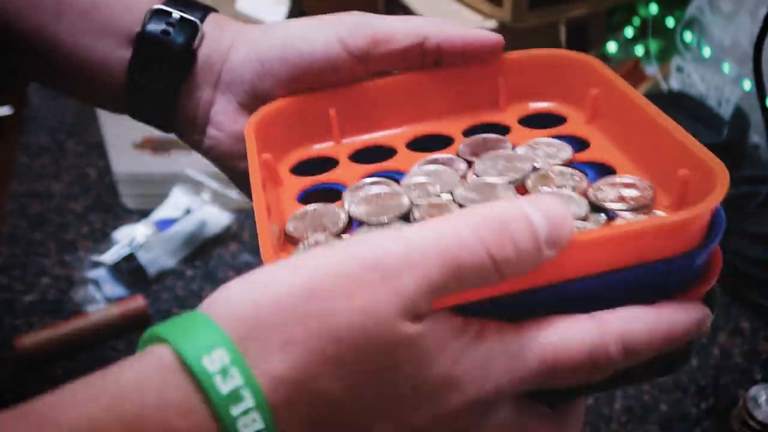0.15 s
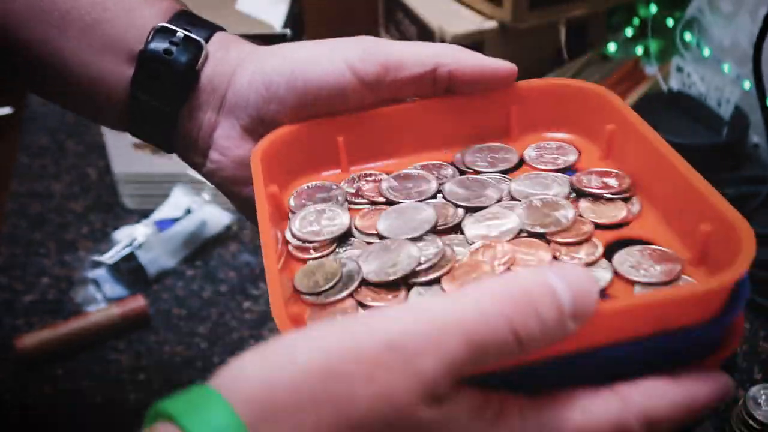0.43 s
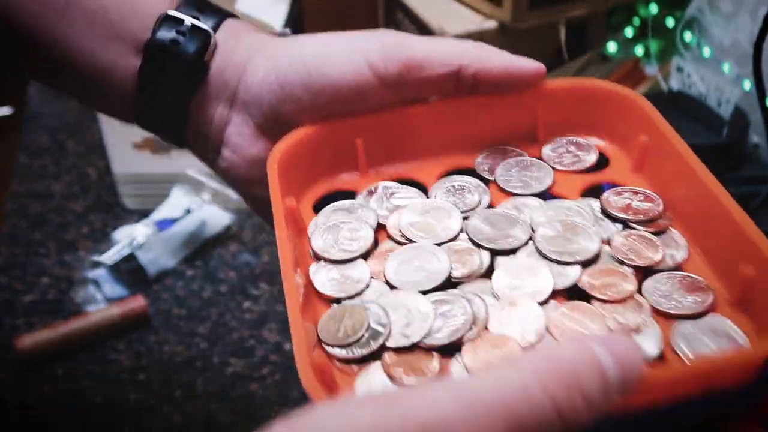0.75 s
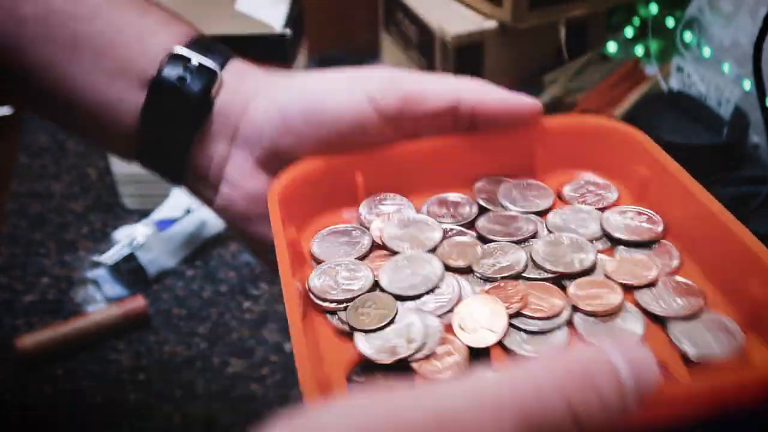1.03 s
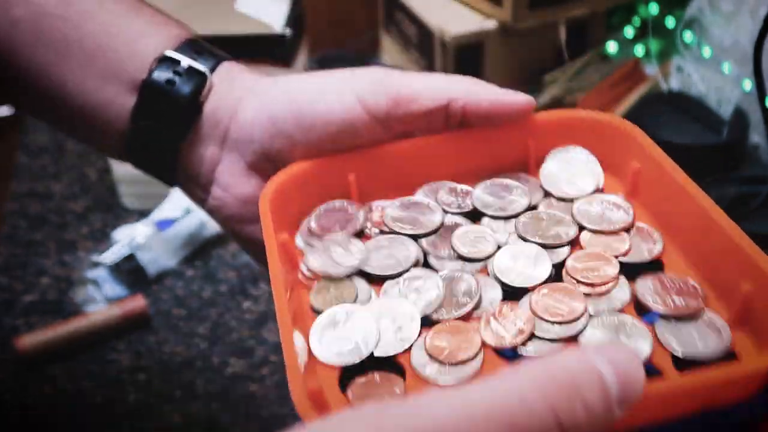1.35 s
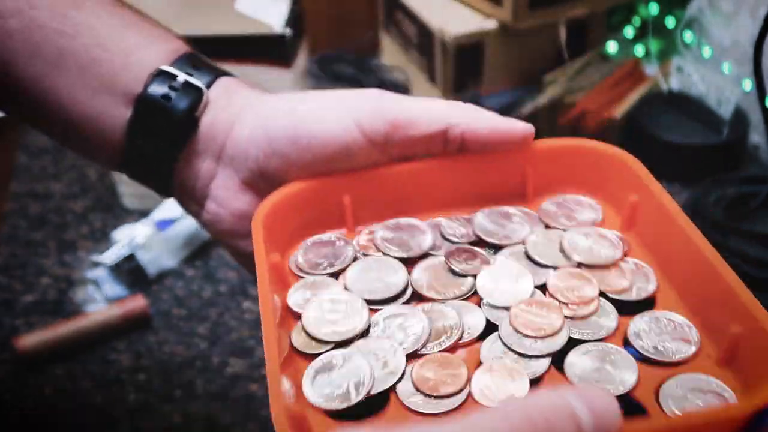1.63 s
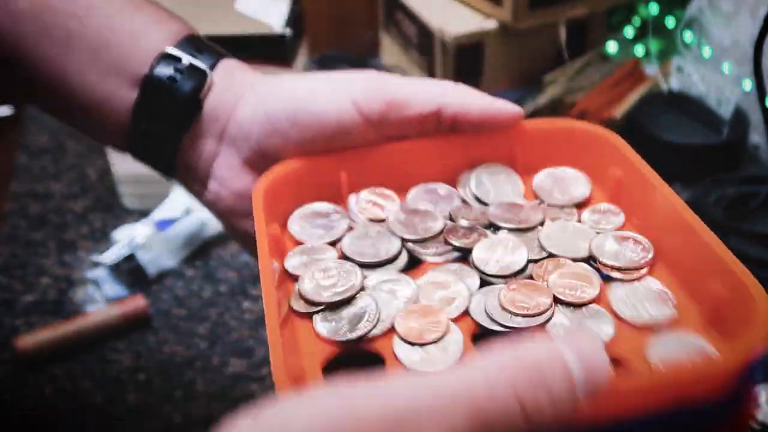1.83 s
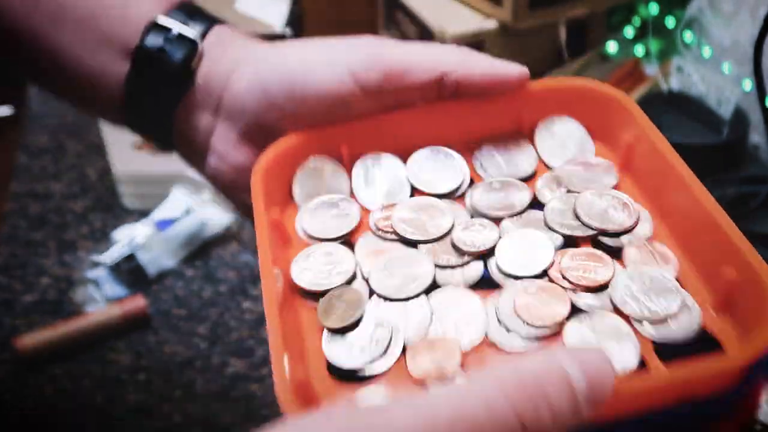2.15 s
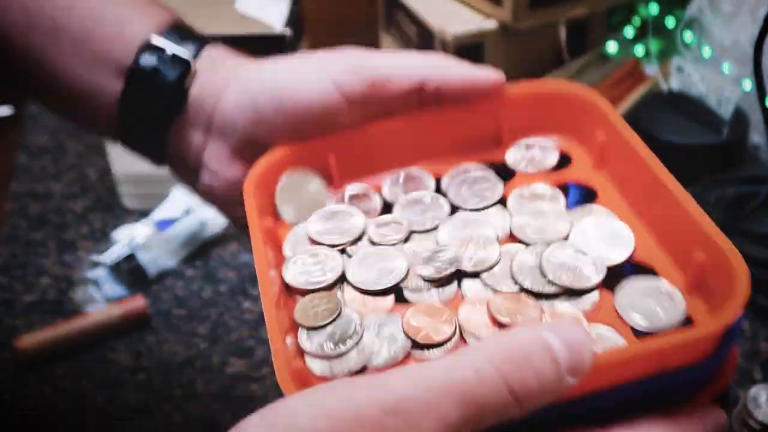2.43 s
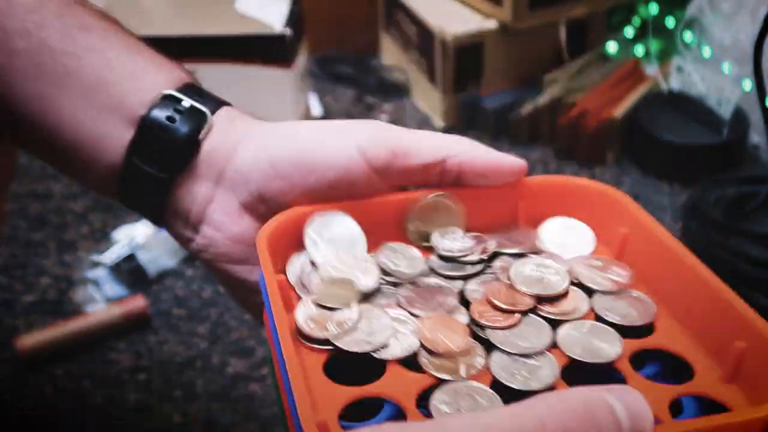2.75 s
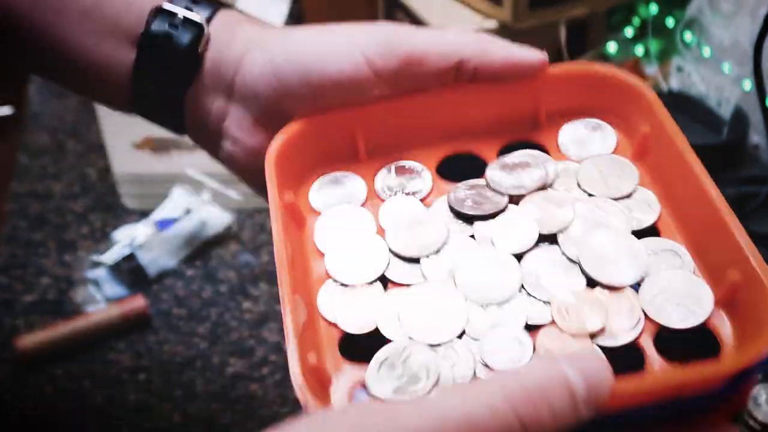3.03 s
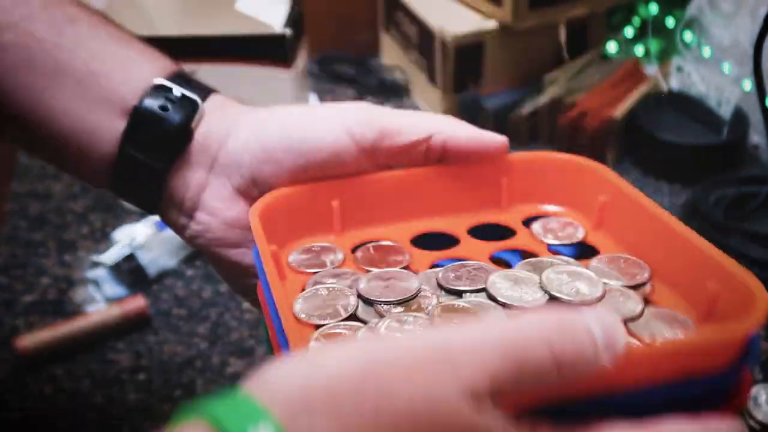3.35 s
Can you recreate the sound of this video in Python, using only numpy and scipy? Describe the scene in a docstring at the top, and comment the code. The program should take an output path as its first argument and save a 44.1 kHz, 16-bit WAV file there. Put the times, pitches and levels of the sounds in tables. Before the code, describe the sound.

Loose coins rattle and clink continuously in a plastic tray shaken by hand.

```python
"""Indoors, close up, in stereo: loose coins rattle in a plastic sorting tray shaken by hand.
Thousands of small knocks ring the tray floor, clatter on its ribs and set the coins singing high up.
Hard knocks stand out, each with a tick and a pitch. The tray bumps with low thuds over faint room tone."""
import sys
import numpy as np
from scipy import signal
from scipy.fft import rfft, irfft
from scipy.io import wavfile
from scipy.ndimage import uniform_filter1d

SR = 44100
rng = np.random.default_rng(int(sys.argv[2]) if len(sys.argv) > 2 else 0)


def inscribe(sig):
    """Save sig as 16-bit PCM at rate SR to the path in sys.argv[1].

    A 1-D sig is mono; a 2-D sig holds one channel per row.
    Samples are clipped to [-1, 1] before scaling.
    """
    pcm = np.round(np.clip(np.atleast_2d(sig).T, -1, 1) * 32767)
    wavfile.write(sys.argv[1], SR, pcm.astype(np.int16))


N = 154350
SPOTS, RING_SAMPLES = 127, 6144  # impact spots on the tray; response length of each


def rattle():
    """Coins striking a tray too small to radiate bass; rows are mid and side."""
    rings = np.array([[spot_rings() for _ in range(2)] for _ in range(SPOTS)])  # spot, row, part, time
    rings /= np.sqrt((rings ** 2).sum(-1).mean((0, 1)))[:, None]  # unit mean energy per part
    knocks = small_knocks(rings) + hard_knocks(rings)
    return signal.sosfilt(signal.butter(5, 317, "high", fs=SR, output="sos"), knocks)


def small_knocks(rings):
    """Random impacts in clumps, denser when shaken hard; the coins move on from spot to spot."""
    # shaking: t/s, clatter level/dB, floor re clatter/dB, coin re clatter/dB (before trim_db)
    shake = [(0.0, -36, 2.5, -14), (0.02, -32.5, -3, -16), (0.08, -33.5, -4, -2.5), (0.1, -31.5, 4, -6),
             (0.202, -21.5, -10.5, -11), (0.251, -32, -7, -14), (0.28, -34.5, 0.5, -6),
             (0.33, -27.5, -1, -4.5), (0.371, -16.5, -6, -8.5), (0.381, -23.5, -6, -2.5),
             (0.541, -42, 1.5, -6), (0.555, -33, 2, -6), (0.58, -35.5, 6.5, -9), (0.59, -22, -3.5, -13.5),
             (0.659, -26, -1, -8), (0.69, -35, 0, -9), (0.78, -28.5, -1, -4.5), (0.84, -34.5, -0.5, -6),
             (0.89, -30, -1, -7), (0.928, -44, 6.5, -4.5), (0.999, -18, -5.5, -6), (1.072, -31.5, -1, -2.5),
             (1.171, -18, -5, -7.5), (1.239, -29, -2.5, -3.5), (1.319, -26, -2, -4.5),
             (1.34, -32.5, -7.5, -2.5), (1.4, -28, 2.5, -7), (1.46, -29, -0.5, 1), (1.54, -29, -2.5, -8),
             (1.59, -30, -7, -3.5), (1.63, -30, -3.5, -12), (1.7, -18.5, -7.5, -8), (1.75, -35, -4, -3),
             (1.77, -24.5, -2, -13.5), (1.849, -29.5, -4, -2), (1.895, -34.5, -2, -2),
             (1.921, -24.5, -6.5, -10), (1.951, -14.5, -4.5, -11), (1.981, -23, -5.5, -4),
             (2.029, -31, -0.5, -1.5), (2.11, -23, -3, -7), (2.13, -28.5, -5.5, 0.5),
             (2.25, -25, -3.5, -9.5), (2.3, -27.5, -1, -2.5), (2.382, -22, -5, -6.5), (2.47, -30, -7, -7),
             (2.52, -28, -2.5, -5), (2.62, -36, -1, -2.5), (2.65, -39.5, -2, -11), (2.671, -29, -4.5, -9),
             (2.71, -39.5, -2.5, -13), (2.748, -41, 9.5, 4), (2.757, -22.5, -9.5, -16),
             (2.82, -21.5, -5, -4.5), (2.92, -28, -1.5, -1.5), (3.09, -29.5, -7, -9), (3.12, -31, -2, -7),
             (3.21, -23, -5, -7.5), (3.391, -36.5, -2, -4.5), (3.475, -34, 2, -9), (3.5, -23, -21, -17)]
    # knock-to-knock scatter/dB of clatter, floor, coin
    scatter_db = [1, 3.5, 3]
    trim_db = [0.5, 0.5, -3]
    base_knocks_per_s, moves_per_s, active_spots = 2300, 28, 30
    clump_db, clump_samples = 1, round(0.017 * SR)
    times_s, clatter_db, floor_db, coin_db = np.transpose(shake)
    t = np.arange(N) / SR
    density = gain_of(0.4 * (np.interp(t, times_s, clatter_db) - clatter_db.mean()))
    drift = uniform_filter1d(uniform_filter1d(rng.standard_normal(N), clump_samples), clump_samples)
    clumps = gain_of(clump_db * unit_rms(drift))
    size = gain_of(3 * np.minimum(rng.exponential(1, N), 4))
    struck = rng.random(N) < base_knocks_per_s * density / SR
    impacts = unit_rms(size * struck * rng.choice([-1, 1], N) * clumps / np.sqrt(density))
    spot = rng.integers(0, active_spots, N) + (moves_per_s * t).astype(int)
    drive = np.zeros((3, N))
    for part, db in enumerate([clatter_db, clatter_db + floor_db, clatter_db + coin_db]):
        uneven = unit_rms(impacts * gain_of(scatter_db[part] * rng.standard_normal(N)))
        drive[part] = uneven * gain_of(np.interp(t, times_s, db) + trim_db[part])
    out = np.zeros((2, N + RING_SAMPLES))
    for k in range(SPOTS):
        start = max(k - active_spots, 0) * SR // moves_per_s
        end = min((k + 1) * SR // moves_per_s + 1, N)
        hits = drive[:, start:end] * (spot[start:end] == k)
        out[:, start:end + RING_SAMPLES - 1] += signal.fftconvolve(hits[None], rings[k], axes=2).sum(1)
    return out[:, :N]


def hard_knocks(rings):
    """Single hard impacts: a tone, clatter around its pitch with a sharp tick, and the tray floor."""
    # hard impacts: t/s, level/dB, f/Hz, relative floor level/dB (before trim), damping t60/s
    knocks = [(0.0409, -18, 2060, -27, 0.059), (0.085, -14.5, 1700, -17, 0.032),
              (0.0902, -12, 1537, 8, 0.11), (0.1166, -9, 1600, -11, 0.034), (0.2, -8, 1650, -6, 0.052),
              (0.2828, -17, 4030, -26.5, 0.12), (0.3335, -13, 1360, 14.5, 0.017),
              (0.3534, -16.5, 4230, -10.5, 0.033), (0.3695, -8, 3770, -30.5, 0.054),
              (0.3818, -6, 2460, -22.5, 0.095), (0.4213, -9.5, 4100, -31, 0.03),
              (0.4498, -16.5, 1490, -11.5, 0.027), (0.5532, -9, 1690, 8, 0.026),
              (0.589, -15, 2100, -5, 0.043), (0.603, -11, 2500, -11, 0.027), (0.633, -5.5, 1650, -22, 0.02),
              (0.6364, -13, 1560, -23.5, 0.024), (0.7026, -14.5, 2420, -24, 0.025),
              (0.7669, -19, 1740, -15, 0.027), (0.8495, -18, 1540, -16, 0.042),
              (0.9693, -14, 4060, -22, 0.025), (0.9891, -7, 2250, -15, 0.035),
              (0.9966, -6, 3410, -20, 0.04), (1.0206, -7.5, 2630, -34, 0.037),
              (1.1154, -10, 2520, 1, 0.039), (1.1383, -10.5, 1610, -1, 0.066),
              (1.1668, -13, 2370, -17, 0.033), (1.1805, -1.5, 2060, -25, 0.024),
              (1.1904, -15, 1630, -15, 0.035), (1.416, -8.5, 2405, -29, 0.082),
              (1.4412, -10, 1700, -31, 0.045), (1.4543, -4, 1510, -41, 0.054),
              (1.5628, -14, 1700, -15, 0.04), (1.6347, -9.5, 5080, -16, 0.083),
              (1.657, -11, 2100, -18, 0.02), (1.6912, -5, 2040, -37, 0.019),
              (1.7644, -11.5, 2370, 0.5, 0.12), (1.8094, -11.5, 1660, -16, 0.046),
              (1.9111, -15.5, 1570, -2, 0.052), (1.939, -11, 1560, -7, 0.047),
              (1.9631, -6.5, 4440, -12, 0.096), (1.9708, -2, 1620, -10, 0.014),
              (1.9764, -7, 3720, -11, 0.034), (2.0101, -16, 1610, -17, 0.041),
              (2.0624, -9.5, 1620, -22, 0.022), (2.131, -13.5, 1730, -17, 0.083),
              (2.1917, -15, 1760, 4, 0.04), (2.2197, -11.5, 1700, -17, 0.063),
              (2.2605, -21, 1750, -16, 0.03), (2.2725, -15, 1840, -18, 0.085),
              (2.3251, -6, 3220, -22.5, 0.03), (2.3437, -14, 1550, -20.5, 0.03),
              (2.3905, -3, 3560, -30, 0.061), (2.4086, -4.5, 3950, -27, 0.04),
              (2.6643, -23, 2770, -11, 0.03), (2.7601, -9.5, 4400, -15, 0.042),
              (2.794, -9.5, 1800, -22, 0.038), (2.8795, -7.5, 2310, 4, 0.095),
              (3.0604, -14, 1860, -15, 0.033), (3.0689, -3.5, 3440, -2.5, 0.034),
              (3.0759, -8, 1880, -3, 0.053), (3.1637, -13, 1800, 2, 0.04), (3.1755, -10, 3500, -27, 0.032),
              (3.1963, -5, 3420, -12, 0.056), (3.2078, -8, 4600, -7, 0.069), (3.241, -9, 2200, -11, 0.033),
              (3.4386, -22, 1550, -1, 0.11), (3.4822, -12, 2320, -35, 0.079)]
    tone_db, tick_db, tail_db, floor_trim_db = -7, -5.5, -3.5, -8
    tick_t60_s, band_ratio = 0.0039, 1.97
    t = np.arange(RING_SAMPLES) / SR
    out = np.zeros((2, N + RING_SAMPLES))
    for k, (start_s, db, hz, floor_db, t60_s) in enumerate(knocks):
        clatter, floor, _ = unit_peak(rings[k]).transpose(1, 0, 2)
        band = signal.butter(2, [hz / band_ratio, hz * band_ratio], "band", fs=SR)
        clatter = unit_peak(signal.lfilter(*band, clatter))
        clatter *= gain_of(tail_db) + gain_of(tick_db - 60 * t / tick_t60_s)
        phase = [[0], [(-1) ** k * np.pi / 2]]  # side in quadrature with mid
        damping = gain_of(-60 * t / t60_s)
        tone = gain_of(tone_db) * damping * np.sin(2 * np.pi * hz * t + phase)
        knock = tone + clatter + gain_of(floor_db + floor_trim_db) * floor
        out[:, round(start_s * SR):][:, :RING_SAMPLES] += gain_of(db) * damping * knock
    return out[:, :N]


def spot_rings():
    """Impulse responses of one spot, with room reverb; rows are rib clatter, tray floor and coin."""
    # tray floor modes: f/Hz, level/dB, t60/s
    floor_modes = [(307, -18, 0.076), (424.5, -10.5, 0.33), (530, -21, 0.04), (568, -9.5, 0.052),
                   (633.4, -5.5, 0.14), (725.3, 4.5, 0.051), (829, 2.5, 0.077), (939, 0, 0.022),
                   (1073, -12, 0.36), (1090, -11.5, 0.25), (1540, 3.5, 0.064), (1700, 1.5, 0.077)]
    # rib clatter spectrum: f/Hz, density level/dB
    clatter_spectrum = [(1100, -8.5), (1540, -7.5), (1900, -2.5), (2500, -2.5), (3600, -4), (5000, -4),
                        (6300, -10), (8100, -14.5), (9400, -20.5), (12700, -20), (14000, -25), (15300, -21),
                        (16200, -8)]
    # rib clatter decay: f/Hz, t60/s
    clatter_decay = [(1200, .03), (3000, .024), (6000, .02), (16000, .018)]
    # coin modes: f/Hz, spread between coins/Hz, level/dB, t60/s
    coin_modes = [(9360, 340, 2, 0.064), (10590, 700, 0, 0.064), (11980, 720, -5, .03),
                  (12700, 340, -3, 0.056), (14900, 220, -4, 0.047)]
    wet_db, room_t60_s = -5, 0.13
    hz, db, t60_s = np.transpose(floor_modes)
    floor = ring(hz * (1 + 0.018 * rng.standard_normal(len(hz))), db, t60_s, scatter_db=4)
    hz = np.linspace(35, 127, num=60) ** 2 * rng.uniform(0.97, 1.03, size=60)
    db = lookup(clatter_spectrum, hz) + 5 * np.log10(hz)  # offsets the widening mode spacing
    clatter = ring(hz, db, lookup(clatter_decay, hz), scatter_db=6)
    hz, spread_hz, db, t60_s = np.transpose(coin_modes)
    coin = ring(hz + spread_hz * rng.standard_normal(len(hz)), db, t60_s, scatter_db=6)
    t = np.arange(RING_SAMPLES) / SR
    tail = rng.standard_normal(len(t)) * gain_of(-60 * t / room_t60_s) * (t > 0.003)
    room = (t == 0) + gain_of(wet_db) * tail / np.linalg.norm(tail)
    return signal.fftconvolve(np.array([clatter, floor, coin]), room[None], axes=1)[:, :len(t)]


def ring(hz, db, t60_s, scatter_db):
    """Struck modes of random sign; db sets each mode's energy before scatter."""
    t = np.arange(2560)[:, None] / SR
    height = gain_of(db + scatter_db * rng.standard_normal(len(hz))) / np.sqrt(t60_s)
    height *= rng.choice([-1, 1], len(hz))
    return (gain_of(-60 * t / t60_s) * np.sin(2 * np.pi * hz * t)) @ height


def thuds():
    """Tray bumps: two low modes that swell quickly and die."""
    # bumps: t/s, level/dB, lower mode f/Hz
    bumps = [(1.378, -39, 116), (1.452, -40, 217), (1.459, -36, 99), (1.515, -50, 78)]
    rise_s, t60_s, overtone_ratio = 0.0019, 0.12, 1.3
    t, out = np.arange(N) / SR, np.zeros(N)
    for start_s, db, hz in bumps:
        age_s = np.maximum(t - start_s, 0)
        modes = np.sin(2 * np.pi * hz * age_s) + np.sin(2 * np.pi * overtone_ratio * hz * age_s)
        out -= gain_of(db - 60 * age_s / t60_s) * (1 - np.exp(-age_s / rise_s)) * modes
    return out


def room_tone():
    """Faint, steady low noise."""
    # room spectrum: f/Hz, relative level/dB
    spectrum = [(15, -40), (30, -16), (60, -11), (90, -4.5), (200, 1.5), (260, -9), (340, -36), (570, -100)]
    return gain_of(-67.5) * unit_rms(coloured(rng.standard_normal(N), spectrum))


def gain_of(db):
    return 10 ** (np.asarray(db) / 20)


def unit_rms(x):
    return x / np.sqrt(np.mean(x ** 2) + 1e-20)


def unit_peak(x):
    return x / abs(x).max(-1, keepdims=True)


def lookup(points, hz):
    """Interpolates a table on a log-frequency axis."""
    f, value = np.transpose(points)
    return np.interp(np.log(hz + 1), np.log(f + 1), value)


def coloured(x, points):
    """Filters by a table of f/Hz, gain/dB."""
    return irfft(rfft(x) * gain_of(lookup(points, np.fft.rfftfreq(len(x), 1 / SR))), len(x))


def scene():
    """Rattle, wide in the treble, with centred thuds and room tone; rows are left and right."""
    # stereo width: f/Hz, side gain/dB
    width = [(60, -50), (100, -40), (180, -38), (310, -53), (550, -49), (950, -29), (1650, -46.5),
             (2860, -11), (4970, -6), (8640, 0.5), (15000, 6.5)]
    mid, side = rattle()
    mid = mid + thuds() + room_tone()
    side = coloured(side, width)
    return np.array([mid + side, mid - side])


def record(dry):
    """Soft-clips the highest peaks, then low-passes."""
    ceiling, cutoff_hz = 1.4, 15730
    soft = ceiling * np.tanh(dry / ceiling)
    lowpass = signal.firwin(1501, cutoff_hz, window=("kaiser", 9), fs=SR)
    return signal.oaconvolve(soft, lowpass[None], "same")


dry = scene()
out = record(dry)
inscribe(out)
```